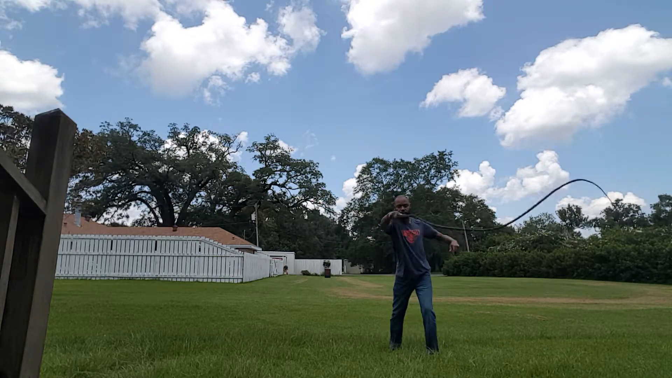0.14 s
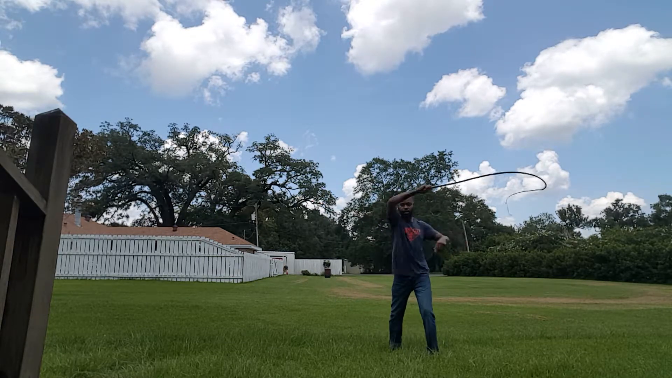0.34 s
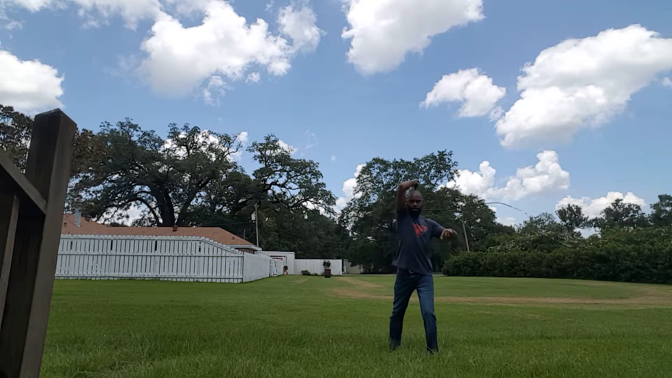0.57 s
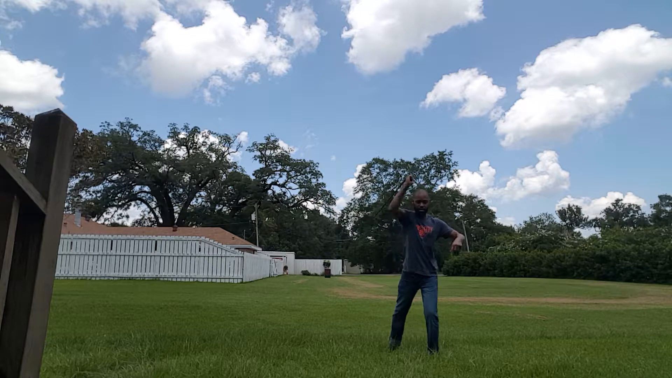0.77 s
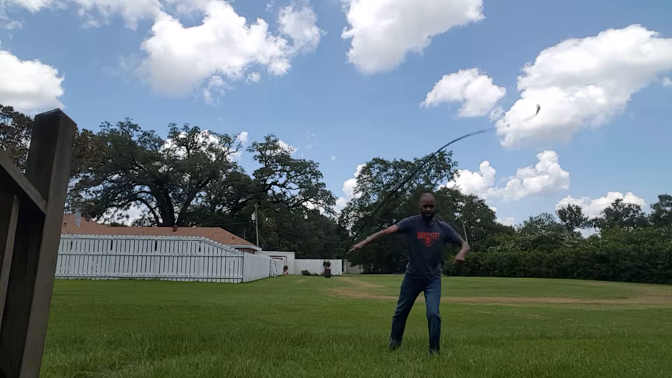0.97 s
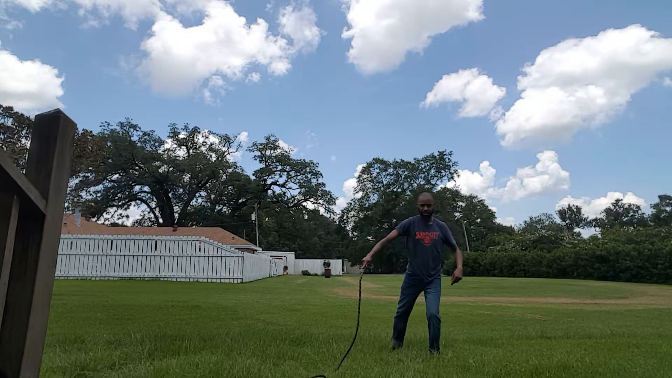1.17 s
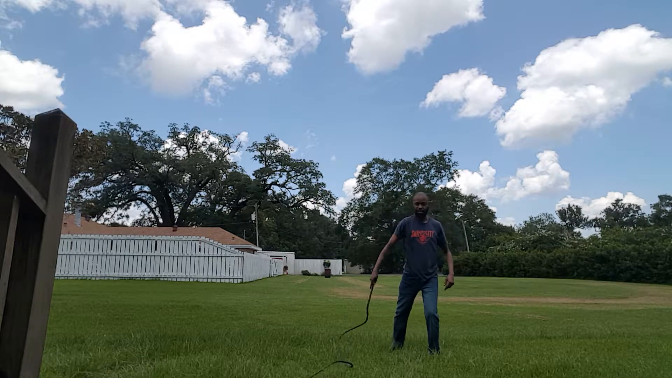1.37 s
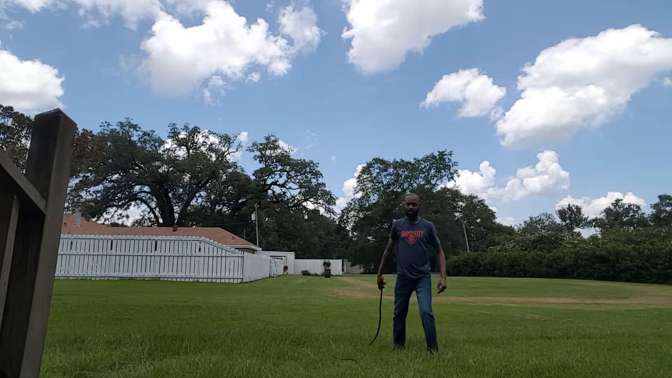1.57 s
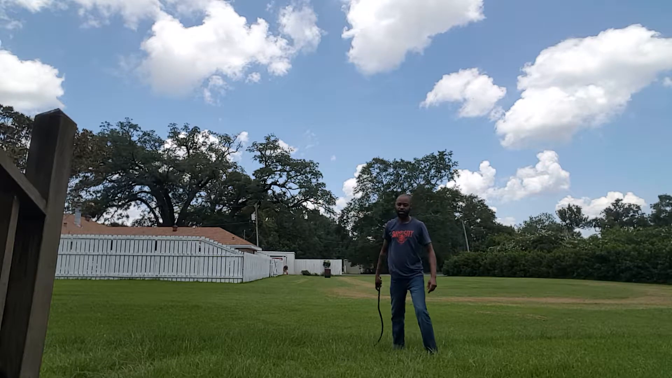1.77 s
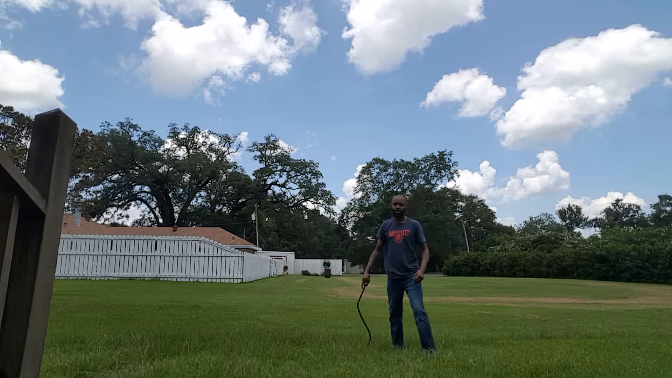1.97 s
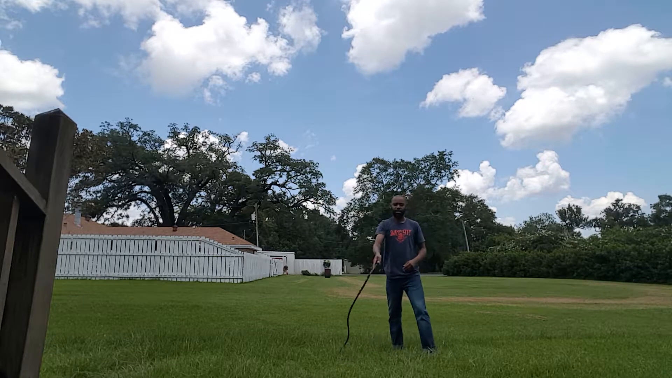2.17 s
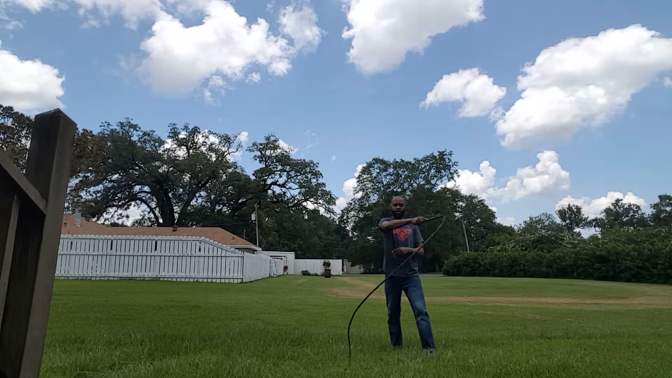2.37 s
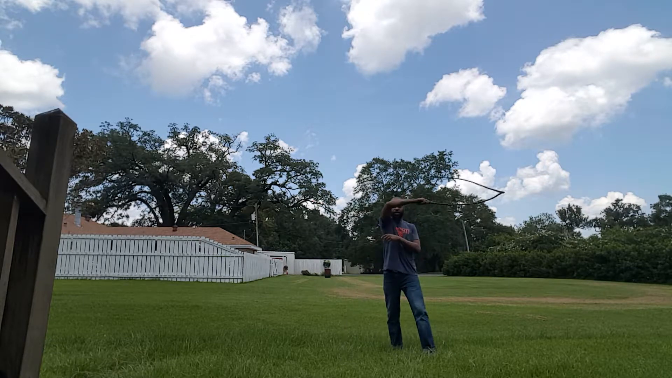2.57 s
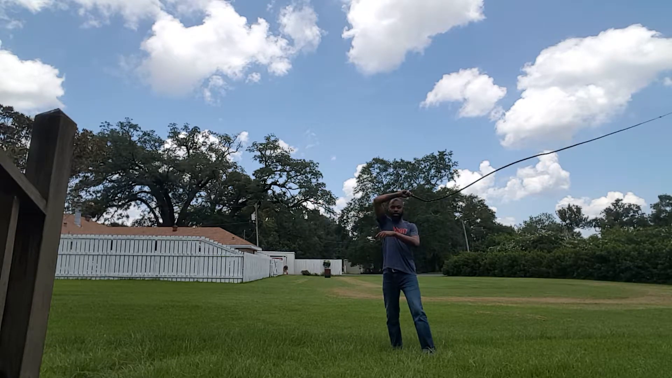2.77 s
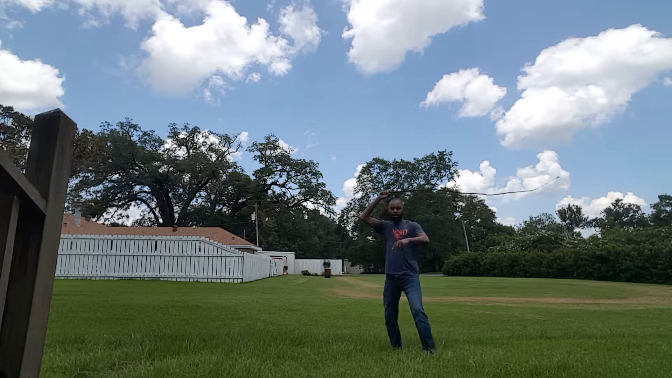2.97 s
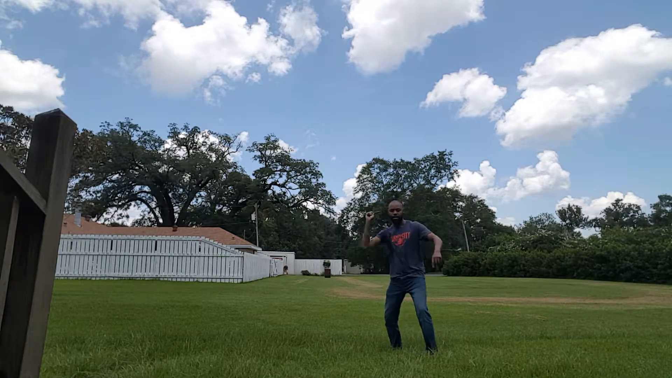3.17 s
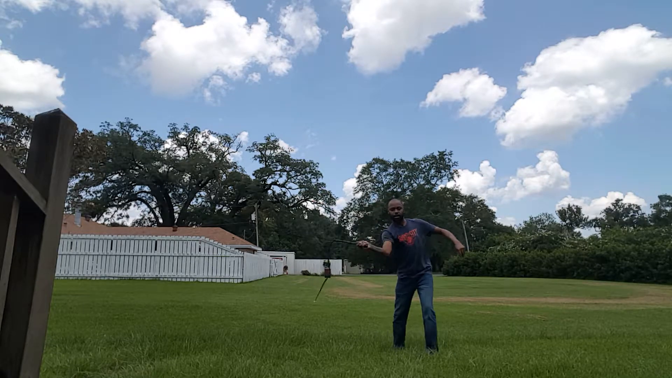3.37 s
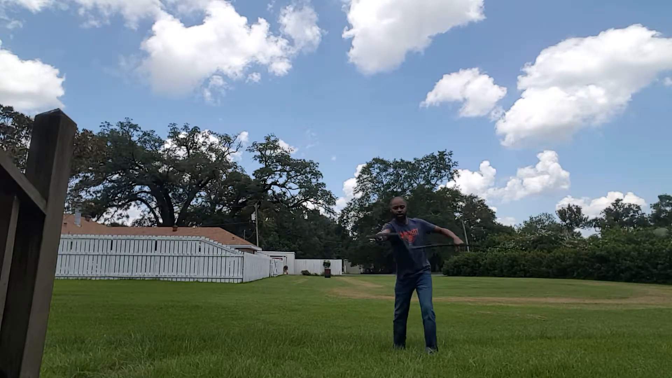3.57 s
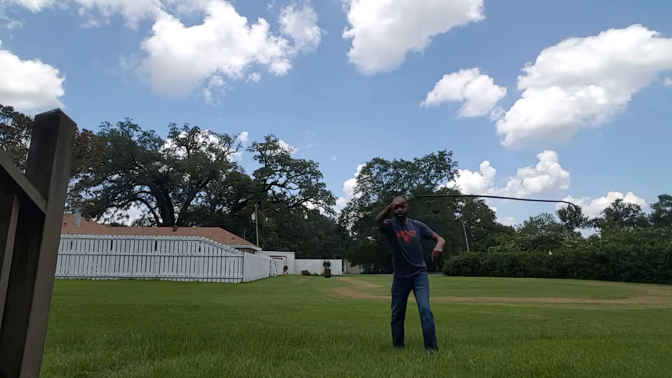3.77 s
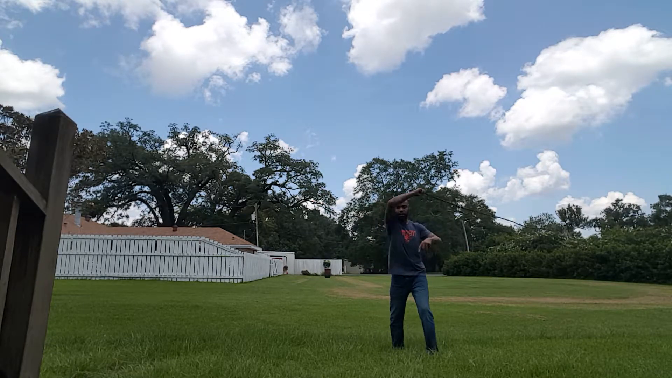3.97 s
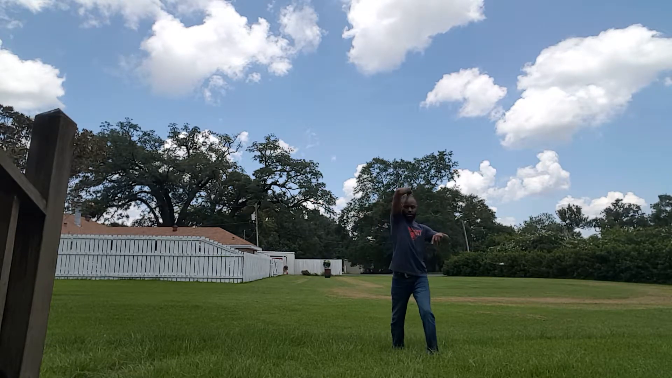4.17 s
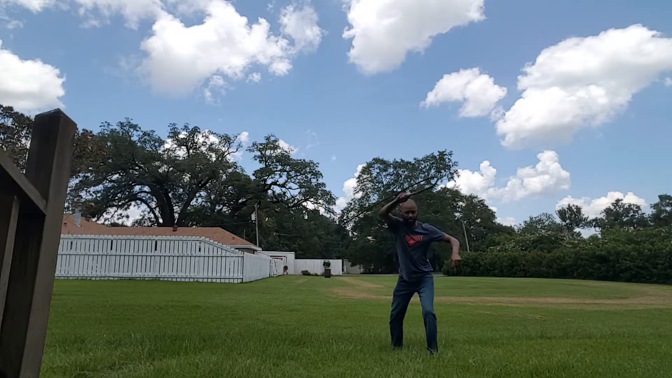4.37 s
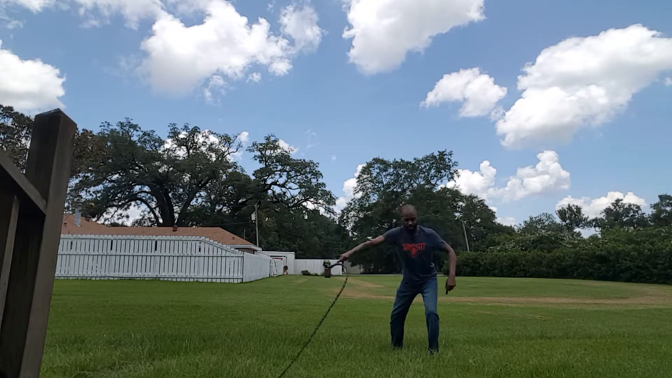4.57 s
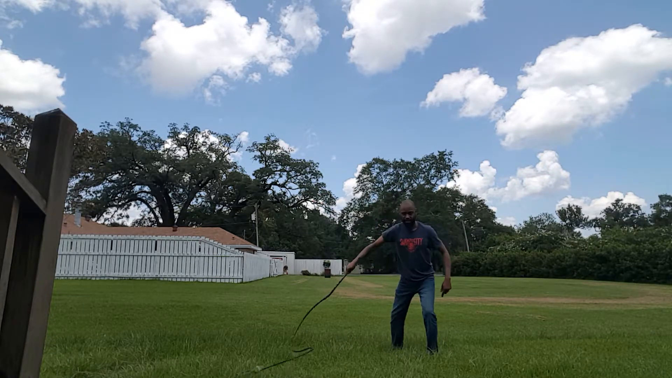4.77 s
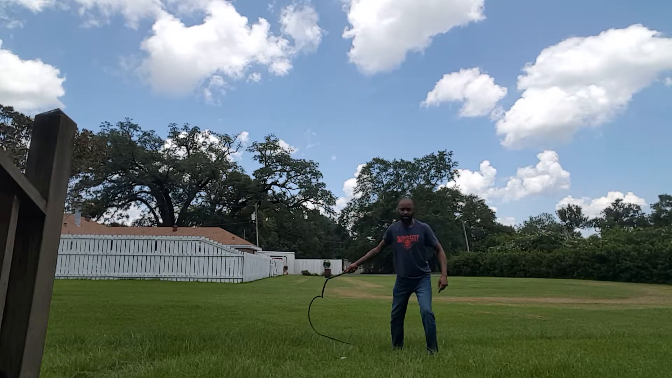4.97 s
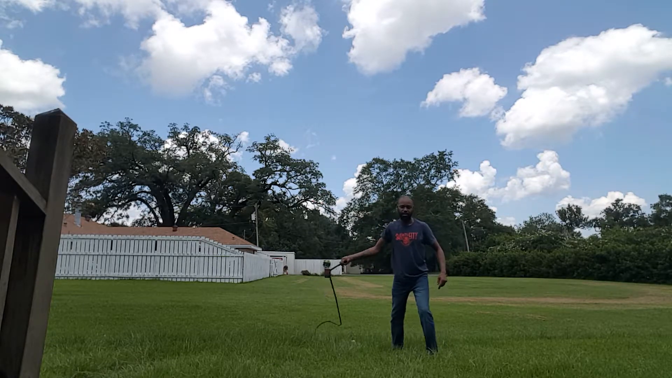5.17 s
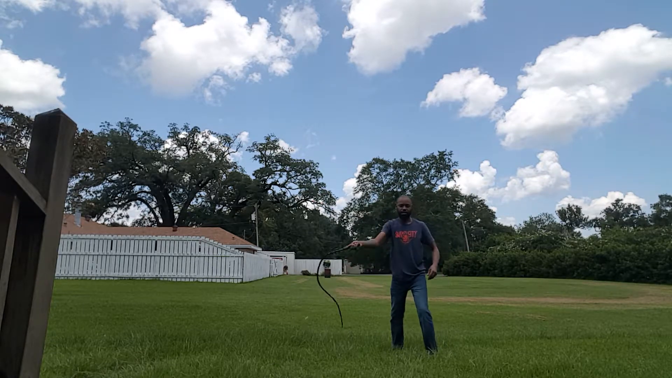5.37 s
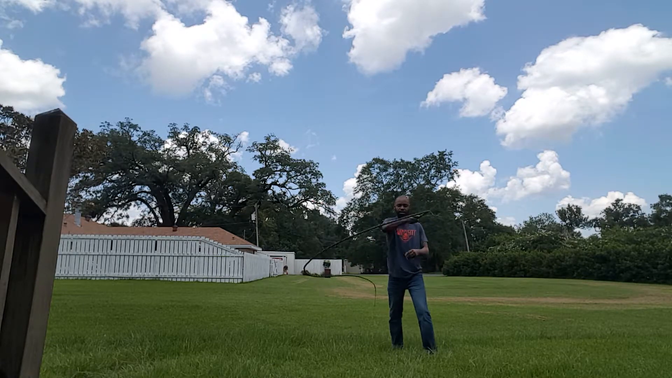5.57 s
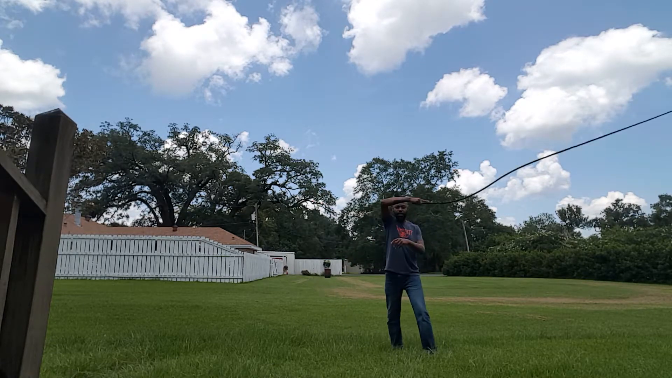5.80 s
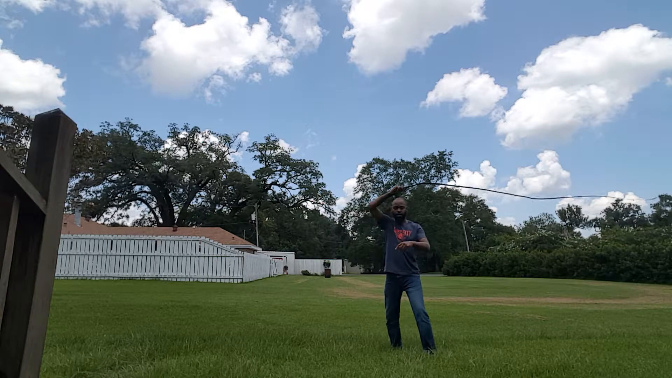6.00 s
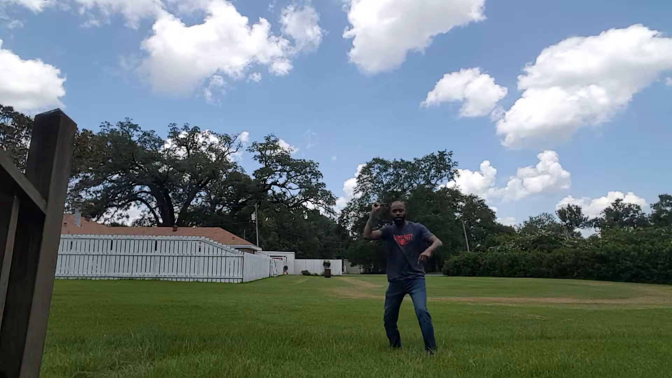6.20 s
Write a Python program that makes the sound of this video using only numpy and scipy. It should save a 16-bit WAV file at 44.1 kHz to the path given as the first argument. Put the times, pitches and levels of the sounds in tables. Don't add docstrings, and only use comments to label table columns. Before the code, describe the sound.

An open lawn with low far-machine rumble, soft leaf hiss and faint insects. Almost immediately, at 0.1 s, a rushing whip loop ends in a huge clipped double crack, with short bright scatter from fence and trees; the background drops sharply and creeps back from about 0.9 s. At 1.04 s a lighter, tight double crack is followed by grass raking and a dull wall slap at 1.35 s. Quiet follows, with quick cricket pulses, cicadas swelling, a small grass swish at 2.5 s and a fluttering whistle and whoosh around 2.7 s. At 3.63 s another overloaded crack ducks the surroundings again. At 4.58 s a crisp lighter crack ends in a strong grass swish, with a faint wall echo at 4.89 s. A weak snap with whistling comes at 5.75 s, then airy whooshing at 6.1 s over rumble and high cicada buzz.

```python
import sys
import numpy as np
from scipy import signal
from scipy.fft import rfft, irfft, next_fast_len
from scipy.io import wavfile
from scipy.ndimage import uniform_filter1d, map_coordinates

SR = 44100
rng = np.random.default_rng(int(sys.argv[2]) if len(sys.argv) > 2 else 0)


def field_ratio(decibels):
    return 10 ** (np.asarray(decibels, dtype=float) / 20)


def wav_out(sig):
    wavfile.write(sys.argv[1], SR, np.round(np.clip(np.atleast_2d(sig).T, -1, 1) * 32767).astype(np.int16))


N = 275184

# f/Hz, level/dB per Hz
LAWN_COLOUR = [(12, -55.5), (20, -26), (48, -11.5), (123, -3), (337, -19.5), (923, -20), (1530, -25),
               (2320, -30.5), (2600, -26), (2820, -28.5), (4060, -29), (5380, -33), (6360, -23),
               (9400, -48), (16000, -48)]
# f/Hz, likeness/0-1
LAWN_LIKENESS = [(60, 1), (130, 0.95), (300, 0.79), (700, 0.043), (1500, 0.64), (3500, 0.41), (7000, 0.063),
                 (12000, .1)]
# f/Hz, width/Hz, level/dB
MACHINES = [(62, 1.6, -9), (119, 23, -5.5), (165, 9.9, -7)]
# f/Hz, width/Hz, level/dB
FAR_INSECTS = [(4040, 120, -5), (4610, 99, -10)]
# f/Hz, level/dB per Hz
CICADA_COLOUR = [(3060, -38.5), (5200, -9), (5460, -28), (5560, -10.5), (5950, 0.5), (6720, -1.5),
                 (8230, -18), (9000, -30.5), (11700, -60.5), (19800, -120)]
# t/s, level/dB over the rumble
CHORUS_SWELL = [(0, -24), (.9, -21.5), (1.3, -16), (1.9, -14), (2.6, -7), (2.95, -5), (3.7, -6.5),
                (4.3, -4.5), (6.24, -5.5)]
# t/s, depth/dB
GAIN_DROPS = [
    (.105, 19),
    (1.044, 3.5),
    (3.627, 17.5),
    (4.584, 4),
]
# t/s, length/s, start f/Hz, end f/Hz, level/dB
SPEEDING_LOOPS = [(.015, .075, 130, 626.5, -31.5), (.05, .052, 497, 1529, -28.5),
                  (.96, 0.06, 389, 1090, -68.5), (3.57, .05, 204.3, 605, -27.5),
                  (3.59, .034, 489, 1502, -23), (3.595, .029, 2315, 2906, -33)]
# t/s, length/s, start f/Hz, end f/Hz, level/dB
THONG_WHISTLES = [(.869, 0.018, 1500, 2300, -50), (.874, .025, 2200, 2540, -47.5),
                  (.932, 0.039, 2010, 2150, -55.5), (2.675, 0.043, 1225, 1505, -39),
                  (2.715, 0.034, 1550, 1304, -35.5), (2.65, 0.043, 740, 940, -52),
                  (2.75, 0.047, 1270, 975, -50), (2.645, .05, 406, 282, -51),
                  (4.44, 0.075, 1790, 1500, -58), (4.452, .035, 614, 560, -49),
                  (4.482, 0.12, 455, 480, -49), (4.522, 0.027, 360, 280, -38),
                  (4.584, 0.009, 14600, 6850, -15), (1.043, 0.014, 14800, 10800, -25.5),
                  (1.046, 0.014, 9800, 6520, -22.5), (1.215, .03, 8600, 7370, -43.5),
                  (5.714, 0.046, 1640, 1990, -36), (5.748, 0.049, 2025, 1714, -32.5),
                  (5.756, 0.046, 3580, 1666, -23.5), (5.785, 0.042, 1440, 1194, -31.5),
                  (5.865, .04, 1340, 1060, -50), (5.795, 0.06, 206, 188, -37), (6.05, 0.1, 264, 166, -46),
                  (6.05, 0.054, 540, 408, -48)]
# t/s, peak level/dB, then rise/s per 20 dB, hold/s, fall/s per 20 dB
AIR_PASSES = [(.08, -32.5, .03, 0, .005), (1.035, -36, .08, 0, 0.0044), (2.66, -48.5, .07, 0.17, .03),
              (3.59, -34, .03, 0, .005), (4.535, -40, .13, 0.016, .01), (5.78, -42.5, .01, 0.055, .25),
              (6.086, -52, .1, 0.037, .12)]
# t/s, peak level/dB, then rise/s per 20 dB, hold/s, fall/s per 20 dB
GRASS_PASSES = [(.083, -47, .015, 0.0015, .005), (1.036, -66, .03, 0.12, 0.0055),
                (1.07, -45, .01, 0.017, 0.021), (1.095, -48, .03, 0.063, 0.11), (1.52, -73, 0.17, 0, .4),
                (2.45, -74, .4, 0.011, .1), (2.524, -53, 0.032, 0.0057, 0.027), (3.62, -42, 0.029, 0, .005),
                (4.576, -55.5, 0.018, 0.0034, 0.0045), (4.6, -34, 0.0071, 0, 0.041),
                (4.63, -46, .02, 0.077, 0.08), (4.87, -69.5, 0.24, 0.26, 0.35),
                (5.306, -72, .04, 0.018, 0.043), (5.564, -74, .06, 0.02, .03)]
# f/Hz, level/dB per Hz
AIR_COLOUR = [(150, -41), (300, -6.5), (700, -16), (1500, -22), (4000, -29.5), (16000, -54.5)]
# f/Hz, level/dB per Hz
GRASS_COLOUR = [(590, -42.5), (1000, -11), (2200, -5.5), (3340, -11), (5020, -13), (5440, -29), (5970, -13),
                (7980, -12), (16000, -18)]
# f/Hz, likeness/0-1
NEAR_LIKENESS = [(200, 1), (500, 0.13), (1200, 0.92), (3000, 0.24), (7000, 0.24)]
# t/s, peak level/dB, lobe length/ms, steepness, rebound/0-1
SHOCK_WAVES = [(.0871, -8, .1, 6, .4), (.0886, -13, .45, 2, .3), (.10435, 5, .36, 18, .3),
               (.1213, -3, .26, 2.5, .1), (1.0442, -2.5, .36, 2.5, .2), (1.0535, -1.5, .31, 2.5, .1),
               (3.6265, 5, .36, 14, .3), (3.6356, -3, .2, 4, .05), (3.6409, -4, .26, 2.5, .2),
               (4.5843, -4.5, .33, 6, .5), (4.5878, -10, .55, 1.5, .35), (4.5934, -7, .28, 4, .2),
               (5.7444, -15, .45, 1.6, .4), (5.7465, -18, .3, 1.6, .2)]
# t/s, spray level/dB, 60 dB decay/s,
# top f/Hz, level/dB of the port's slow heave
SHOCK_SPRAYS = [(0.0867, -9.5, 0.0087, 9000, -56.5), (0.1033, -6, .02, 2503, -13.5),
                (1.0437, -23.5, 0.013, 4935, -28), (1.131, -31.5, 0.022, 9000, -60),
                (1.3467, -41.5, 0.015, 3450, -82), (3.6263, -5, .018, 2701, -13.5),
                (4.583, -17, 0.014, 4000, -57), (4.8875, -35.5, 0.0087, 2790, -70),
                (5.744, -24.5, 0.016, 2480, -57)]
# t/s, level/dB, treble
# level/dB, 60 dB decay/s, tilt/dB per octave
NEAR_ECHOES = [(0.085, -18, 2.5, 0.068, -1.5), (.105, -5.5, -5.5, 0.11, 1.5), (1.043, -14.5, 1, 0.21, -2),
               (3.59, -28.5, -14, 0.27, 9), (3.627, -7, -6, .11, 1), (4.555, -30.5, -4, 0.44, -0.5),
               (4.582, -16, 7.5, 0.2, -5.5), (5.741, -27, 3, 0.16, -1)]
# f/Hz, level/dB per Hz
ECHO_COLOUR = [(59, -36.5), (100, -6.5), (595, -6.5), (1100, -9), (1360, -7), (1550, -14), (2320, -12),
               (3700, -22), (8640, -28), (16000, -46.5)]
# t/s, peak level/dB, centre f/Hz, 60 dB decay/s
WALL_ECHOES = [(.4, -53, 1997, 0.16), (1.335, -38, 1180, 0.11), (1.3467, -26, 1340, 0.13),
               (1.3568, -30.5, 1300, 0.21), (3.922, -50.5, 1900, 0.2), (4.887, -36.5, 2260, 0.088),
               (4.898, -41, 1880, 0.076)]
# f/Hz, level/dB
MICROPHONE_RESPONSE = [(7000, 0.5), (8500, 0.5), (9500, -6), (11000, -2.5), (13500, 1), (15700, -5.5),
                       (16300, -27.5)]

RUMBLE_DB = -46
CRACK_LAG_S = 0.0002
LAWN_LAG_S = 0.00042


def unit(x):
    return x / np.sqrt(np.mean(x ** 2) + 1e-20)


def along(points, hz):
    f, v = np.transpose(points)
    return np.interp(np.log(hz + 1), np.log(f + 1), v)


def wobble(rate):
    knots = rng.standard_normal(int(N * rate / SR) + 4)
    return map_coordinates(knots, [np.arange(N) * rate / SR])


def noise(gain, count=N, alike=NEAR_LIKENESS, late_s=-CRACK_LAG_S / 2):
    size = next_fast_len(count)
    hz = np.fft.rfftfreq(size, 1 / SR)
    turn = np.arccos(np.clip(along(alike, hz), -1, 1)) / 2
    mid, side = rfft(rng.standard_normal((2, size))) * gain(hz) * [np.cos(turn), np.sin(turn)]
    late = np.exp(-2j * np.pi * late_s * np.maximum(hz - 250, 0))
    return unit(irfft([(mid + side) * late, mid - side], size)[:, :count])


def add(out, s, sound):
    start = max(round(s * SR), 0)
    out[:, start:start + sound.shape[1]] += sound


def rumble_db():
    close_s, half_back_s, back_spread_s = 0.12, 0.78, 0.12
    t = np.arange(N) / SR
    level_db = np.full(N, float(RUMBLE_DB))
    for s, depth_db in GAIN_DROPS:
        since = t - s
        closing = 1 - np.exp(-np.maximum(since, 0) / close_s)
        still_down = (1 - np.tanh((since - half_back_s) / (2 * back_spread_s))) / 2
        level_db -= depth_db * closing * still_down
    return level_db


def lawn():
    swell_db = np.interp(np.arange(N) / SR, *np.transpose(CHORUS_SWELL))

    def far(gain):
        return noise(gain, alike=LAWN_LIKENESS, late_s=LAWN_LAG_S)

    def band(hz, width):
        return far(lambda f: 1 / (width ** 2 + (f - hz) ** 2))

    air = far(lambda hz: field_ratio(along(LAWN_COLOUR, hz)) * np.where(abs(hz - 5500) < 2600, 0.3, 1))
    leaves = far(lambda hz: field_ratio(along(LAWN_COLOUR, hz)) * (abs(hz - 4150) < 1250))
    drones = field_ratio(2.2 * wobble(7.3)) * sum(field_ratio(db) * band(hz, width) for hz, width, db in MACHINES)
    singers = sum(field_ratio(db + 1.2 * wobble(17)) * band(hz, width) for hz, width, db in FAR_INSECTS)
    cicadas = field_ratio(swell_db + 0.53 * wobble(10)) * far(lambda hz: field_ratio(along(CICADA_COLOUR, hz)))
    hiss_gain = field_ratio(-9.5 + 0.45 * swell_db)
    return field_ratio(rumble_db()) * (field_ratio(1.0) * air + drones + hiss_gain * (leaves + singers) + cicadas)


def cricket():
    start_s, gap_s, quicken_s = 1.508, 0.1185, 0.00038
    level_db, fade_db, scatter_db = -7.5, 0.23, 2
    t, k = np.arange(N) / SR, np.arange(-12, 48)
    times = start_s + gap_s * k - quicken_s * k ** 2
    away = np.maximum(k - 6, 4 * (4 - k))
    sizes = field_ratio(level_db - fade_db * away + scatter_db * rng.standard_normal(len(k)))
    nearest = np.round(np.interp(t, times, np.arange(len(k)))).astype(int)
    pulses = field_ratio(rumble_db()) * sizes[nearest] * np.exp(-((t - times[nearest]) / 0.018) ** 4)
    phase = 2 * np.pi * 2645 * (t - np.array([[LAWN_LAG_S], [0]])) + 0.64 * wobble(70)
    return pulses * (field_ratio(1.7 * wobble(87)) * np.sin(phase) + 0.69 * np.sin(1.24 * phase))


def eddies(rows, shape, rough, bend, late_s):
    out = np.zeros((2, N + SR))
    for s, length, start_hz, end_hz, db in rows:
        u = np.arange(int(length * SR)) / (length * SR)
        pitch = start_hz * (end_hz / start_hz) ** (u ** bend)
        cycles = np.cumsum(pitch) / SR
        knots = rng.standard_normal((2, 2000))
        flutter = [map_coordinates(k, [cycles * 0.27]) for k in knots]
        tone = (1 + rough * (flutter[0] + 1j * flutter[1])) * np.exp(2j * np.pi * cycles)
        left = tone * np.exp(-2j * np.pi * pitch * late_s)
        add(out, s, field_ratio(db) * shape(u) * np.real([left, tone]))
    return out[:, :N]


def strokes(rows):
    lead_db, lead_longer = -19.5, 2.8
    t, gain = np.arange(N) / SR, 0
    for s, db, rise, hold, fall in rows:
        early = np.maximum(s - t, 0) / abs(rise)
        late = np.maximum(t - s - hold, 0) / abs(fall)
        approach = field_ratio(-20 * early) + field_ratio(lead_db - 20 * early / lead_longer)
        gain = gain + field_ratio(db - 20 * late) * approach
    return uniform_filter1d(gain, size=200)


def thong():
    runups = eddies(SPEEDING_LOOPS, lambda u: u ** 1.6 * (1 - u ** 12), rough=0.45, bend=1.25,
                    late_s=-CRACK_LAG_S)
    whistles = eddies(THONG_WHISTLES, lambda u: np.sin(np.pi * u ** 0.52), rough=0.3, bend=0.68,
                      late_s=LAWN_LAG_S)
    tones = whistles + runups
    t = np.arange(SR // 5) / SR
    yard = rng.standard_normal((2, len(t))) * field_ratio(-60 * t / 0.1)
    smear = field_ratio(-6) * signal.fftconvolve(tones, yard / np.linalg.norm(yard[0]), axes=1)[:, :N]
    whoosh = strokes(AIR_PASSES) * field_ratio(1.8 * wobble(42) - 5.5)
    whoosh = whoosh * noise(lambda hz: field_ratio(along(AIR_COLOUR, hz)))
    hiss = strokes(GRASS_PASSES) * field_ratio(9.5 + 0.72 * wobble(90))
    hiss = hiss * noise(lambda hz: field_ratio(along(GRASS_COLOUR, hz)))
    return tones + smear + whoosh + hiss


def shocks():
    out = np.zeros((2, N + SR))
    t = np.arange(-200, 600) / SR - np.array([[-CRACK_LAG_S / 2], [CRACK_LAG_S / 2]])
    for s, db, lobe_ms, steep, rebound in SHOCK_WAVES:
        u = t / (lobe_ms / 1000)
        front = -np.tanh(steep * u) * np.exp(-np.where(u > 0, u / 1.45, u) ** 2 / 2)
        back = rebound * np.exp(-((u - 6) / 3.1) ** 2)
        add(out, s - 200 / SR, field_ratio(db) * (front + back))
    return out[:, :N]


def sprays():
    out, t = np.zeros((2, N + SR)), np.arange(SR // 20) / SR
    for s, db, t60, top_hz, heave_db in SHOCK_SPRAYS:
        burst = noise(lambda hz: hz / (hz + 1200) / (1 + (hz / top_hz) ** 2.0), count=len(t))
        burst = burst * field_ratio(db - 60 * t / t60 + np.array([[-5], [3]]))
        heave = field_ratio(heave_db) * t / 0.0025 * np.exp(1 - t / 0.0025)
        add(out, s, burst + heave * [[0.12], [1]])
    return out[:, :N]


def echoes():
    out, t = np.zeros((2, N + SR)), np.arange(SR // 2) / SR
    split_hz = 2800

    for s, db, treble_db, t60, tilt_db in NEAR_ECHOES:
        def low_colour(hz):
            tilt = field_ratio(tilt_db * np.log2((hz + 100) / 800)) * hz ** 2 / (hz ** 2 + 140 ** 2)
            return field_ratio(along(ECHO_COLOUR, hz)) * tilt / (1 + (hz / split_hz) ** 4)

        def high_colour(hz):
            return field_ratio(along(ECHO_COLOUR, hz)) / (1 + (split_hz / (hz + 1)) ** 4)

        lumps = field_ratio(2.2 * wobble(300)[:len(t)])
        low_fade = field_ratio(-60 * t / t60) + 0.075 * field_ratio(-25 * t / t60)
        high_fade = field_ratio(-75 * t / t60) + 0.14 * field_ratio(-32 * t / t60)
        low = noise(low_colour, count=len(t)) * lumps * low_fade
        high = noise(high_colour, count=len(t)) * field_ratio(treble_db - 8.5) * high_fade
        swell = (1 - np.exp(-t / (0.04 * t60))) ** 2
        add(out, s, field_ratio(db) * swell * (low + high))

    for s, db, hz0, t60 in WALL_ECHOES:
        def dull(hz):
            return hz * hz0 / (hz0 ** 2 + ((hz ** 2 - hz0 ** 2) / (0.5 * hz0)) ** 2)

        puff = noise(dull, count=len(t), late_s=LAWN_LAG_S)
        fade = field_ratio(-60 * t / 0.011) + 0.42 * field_ratio(-60 * t / t60)
        add(out, s, field_ratio(db) * puff * (1 - np.exp(-t / 0.00022)) * fade)
    return out[:, :N]


def scene():
    surroundings = lawn() + cricket() + thong() + echoes()
    highpass = signal.butter(2, 110, "high", fs=SR)
    return signal.lfilter(*highpass, shocks()) + sprays() + surroundings * field_ratio([[-0.9], [0.9]])


def low_pass(x):
    return signal.sosfilt(signal.butter(12, 16480, fs=SR, output="sos"), x)


def record(dry):
    size = next_fast_len(N + 4096)
    response = field_ratio(along(MICROPHONE_RESPONSE, np.fft.rfftfreq(size, 1 / SR)))
    heard = irfft(rfft(dry, size) * response, size)[:, :N]
    flattened = heard / (1 + np.abs(heard / 0.99) ** 12) ** (1 / 12)
    return low_pass(flattened)


dry = scene()
out = record(dry)
wav_out(out)
```